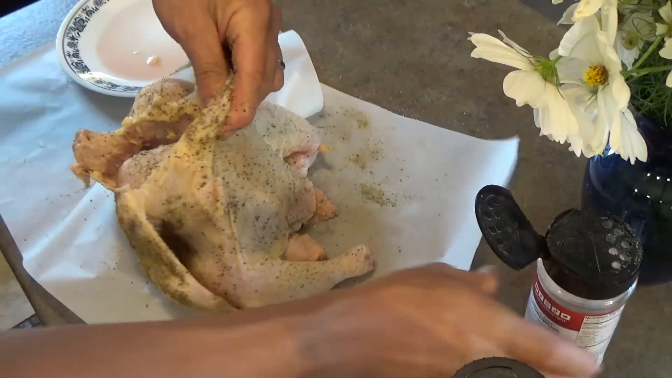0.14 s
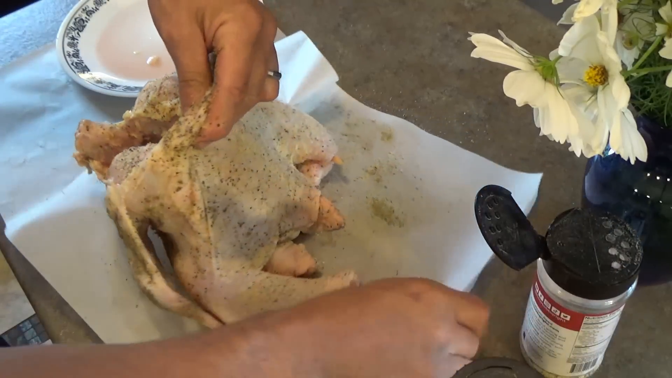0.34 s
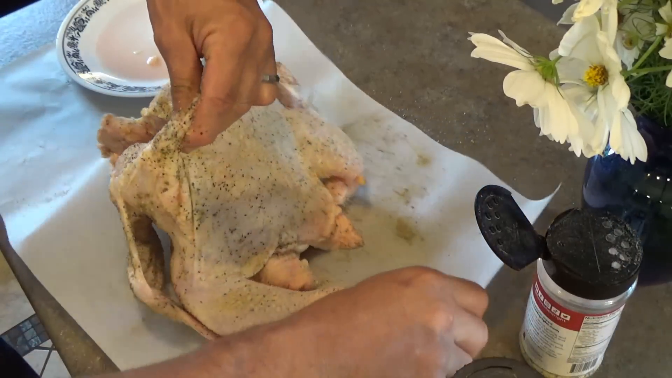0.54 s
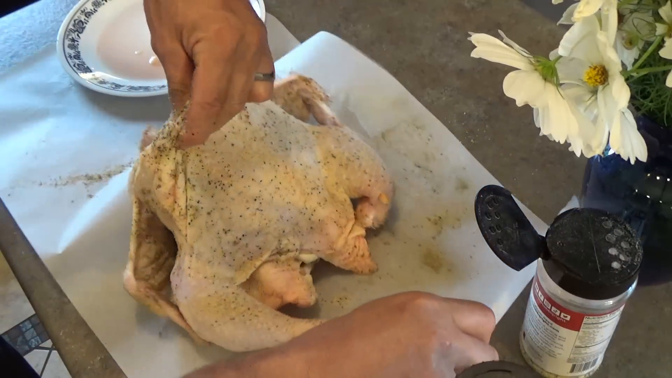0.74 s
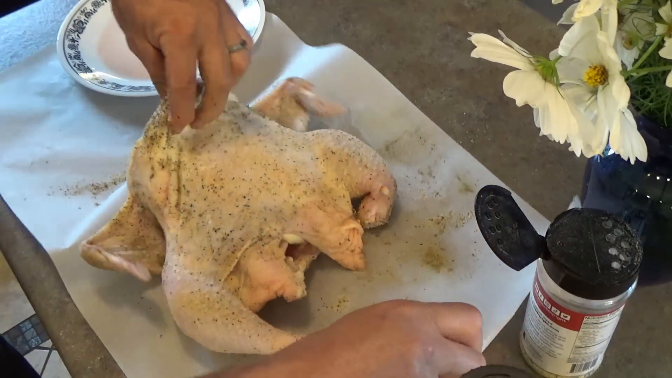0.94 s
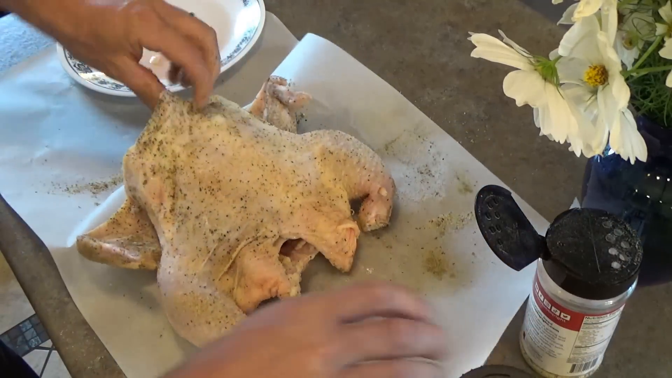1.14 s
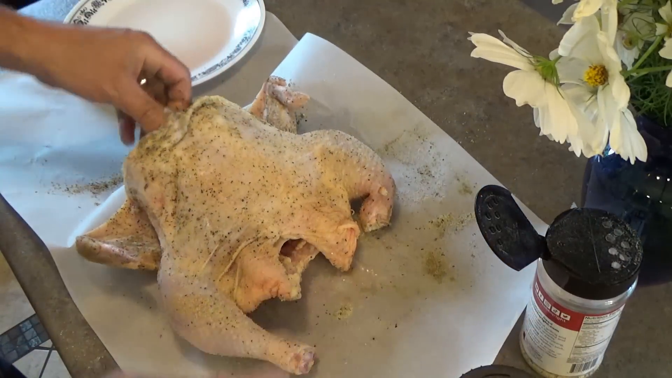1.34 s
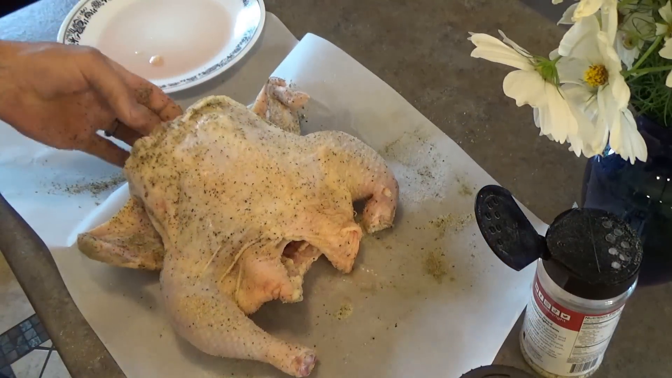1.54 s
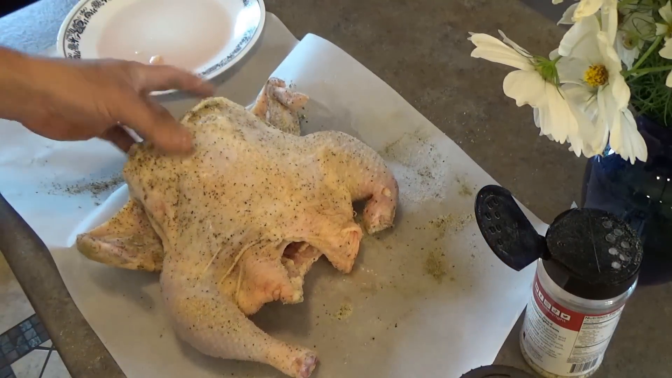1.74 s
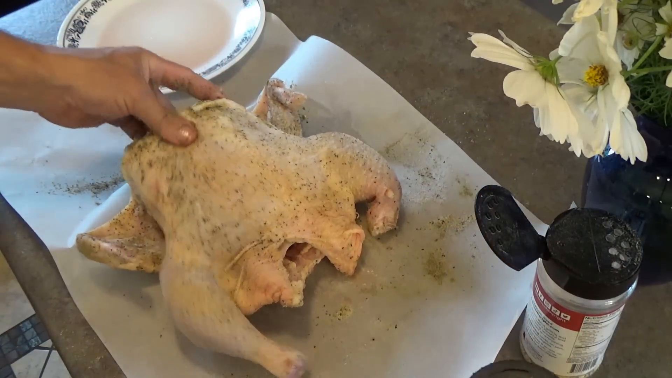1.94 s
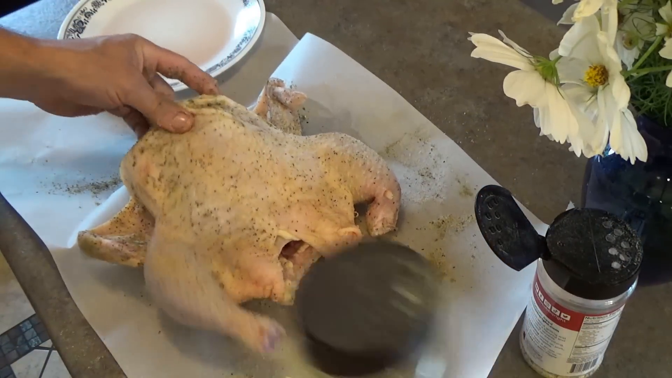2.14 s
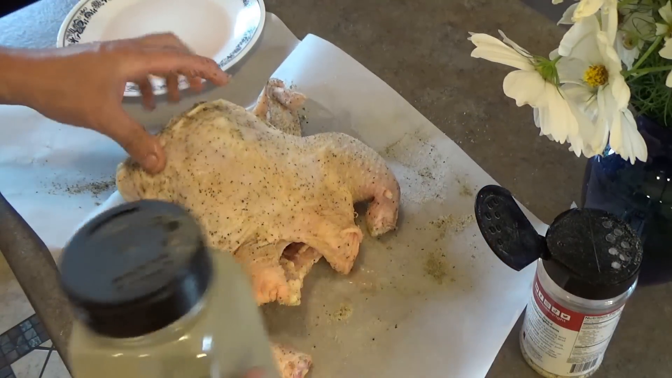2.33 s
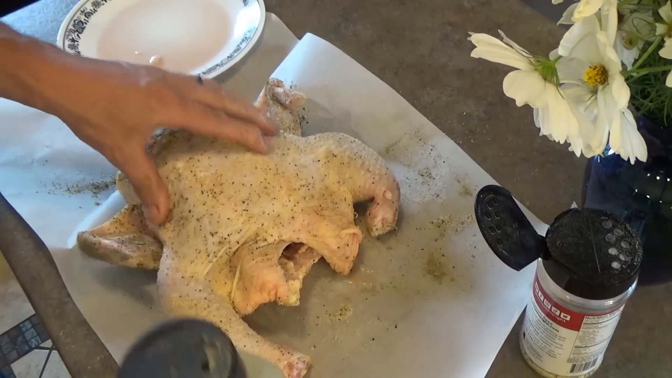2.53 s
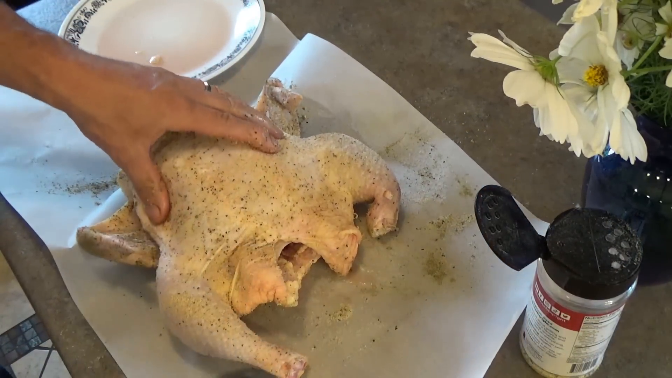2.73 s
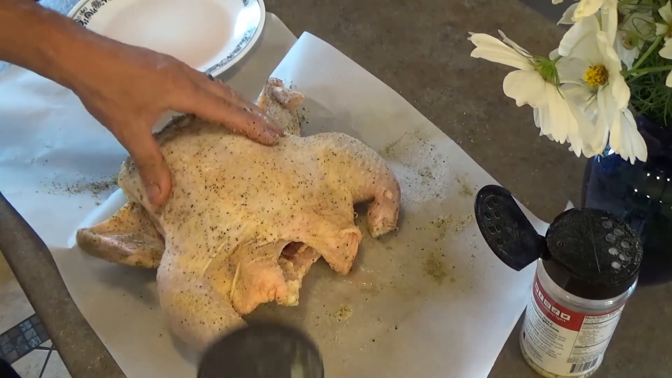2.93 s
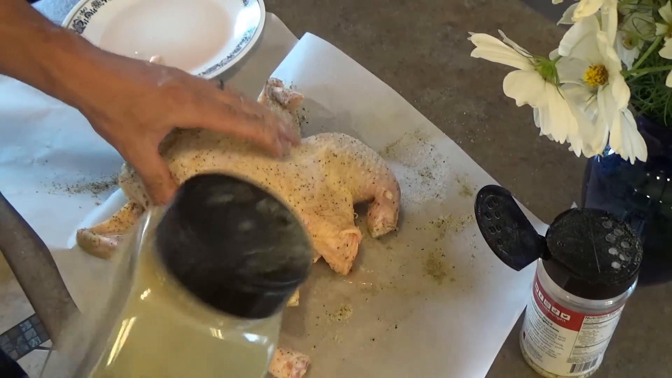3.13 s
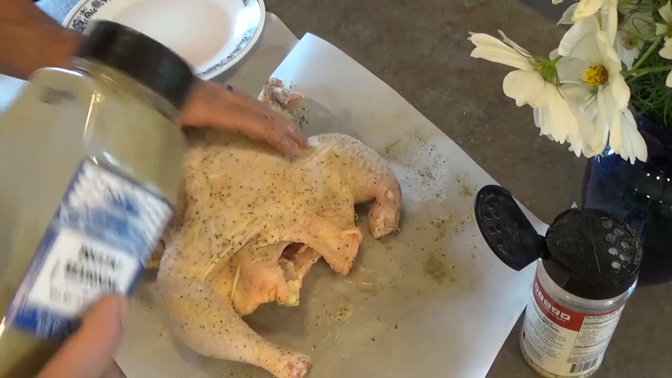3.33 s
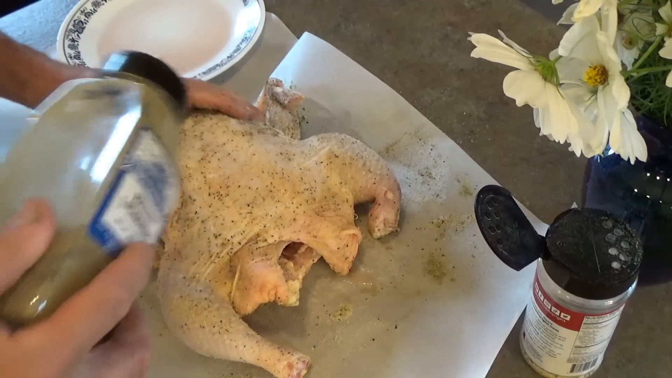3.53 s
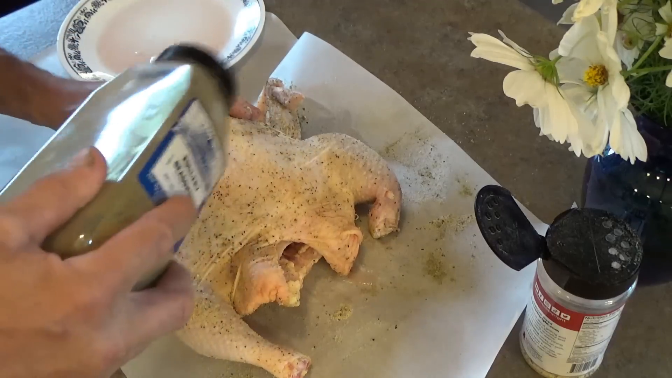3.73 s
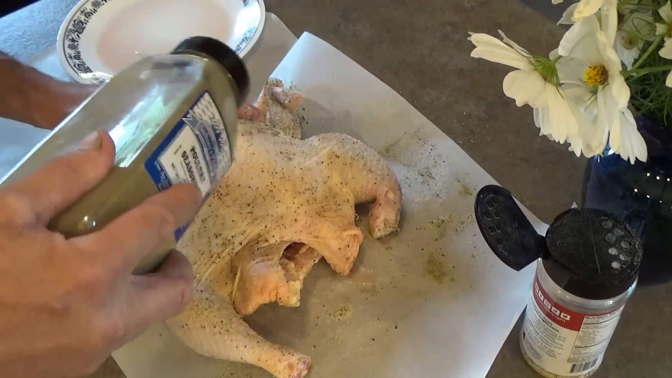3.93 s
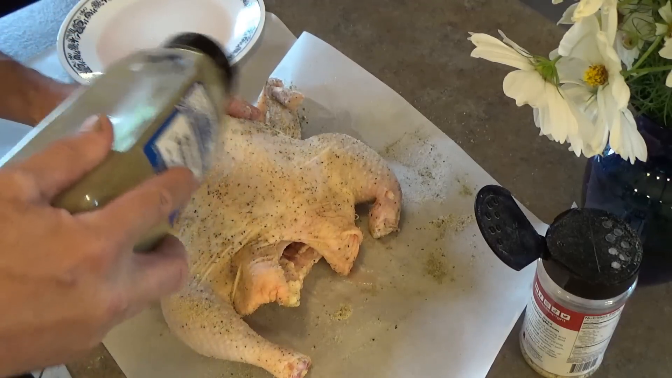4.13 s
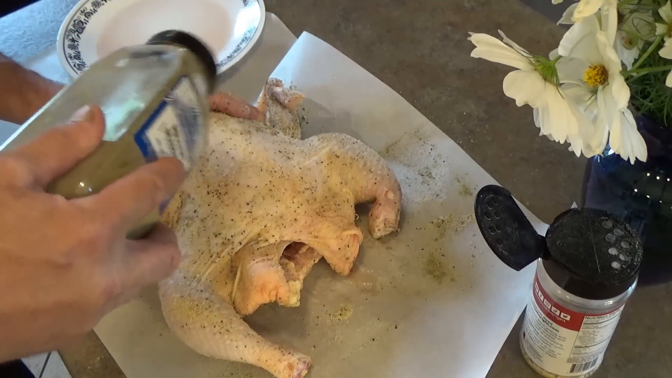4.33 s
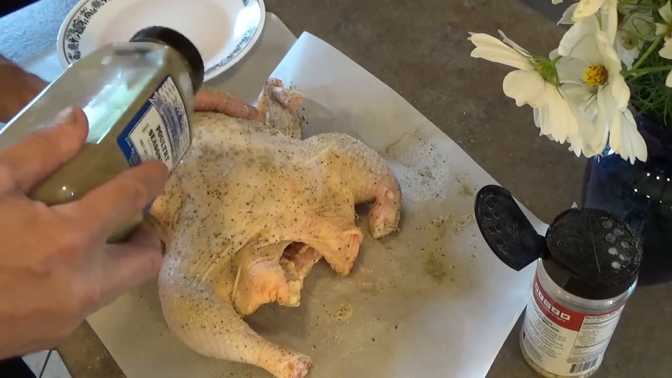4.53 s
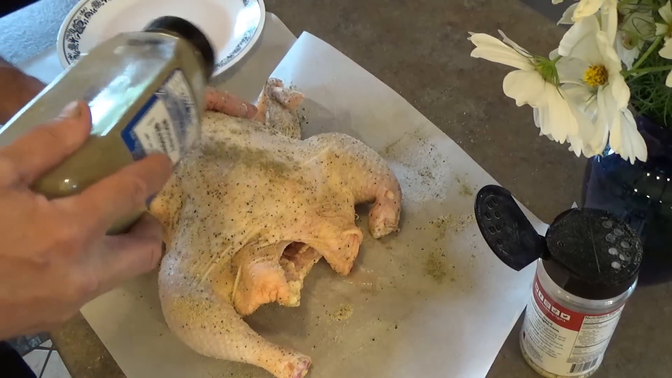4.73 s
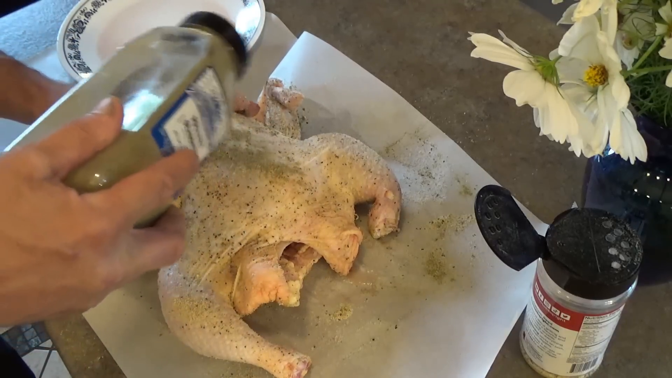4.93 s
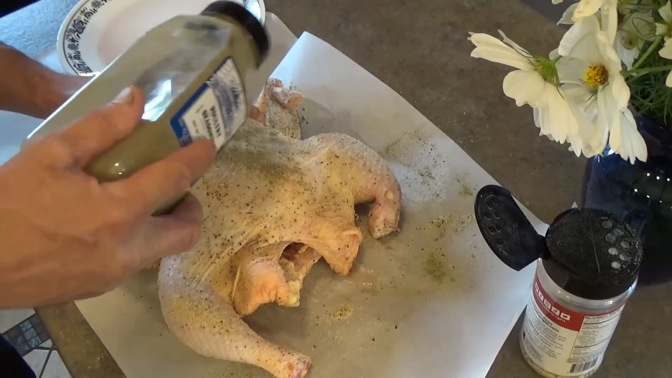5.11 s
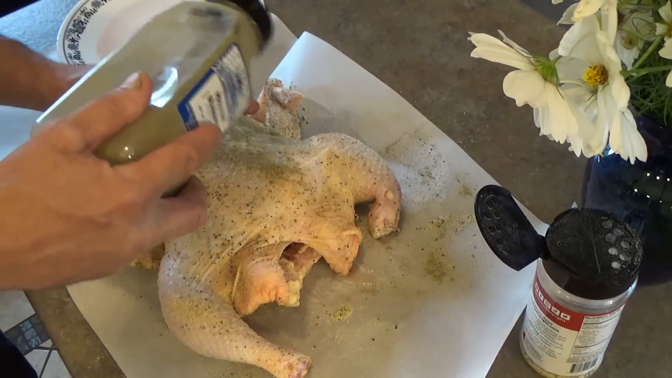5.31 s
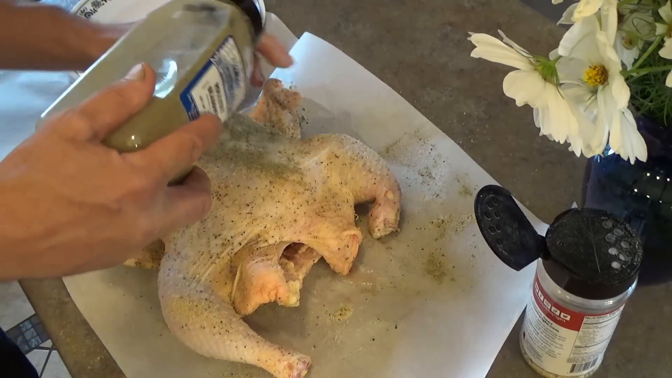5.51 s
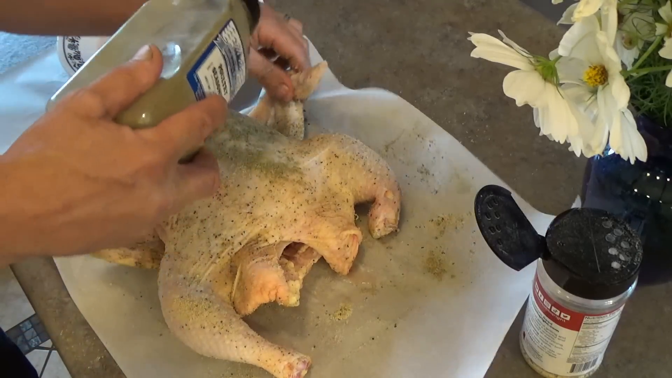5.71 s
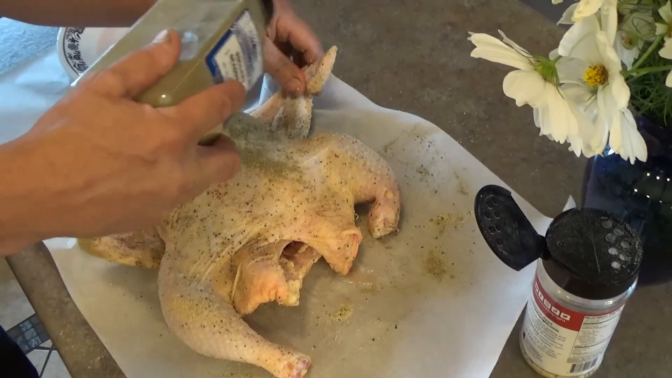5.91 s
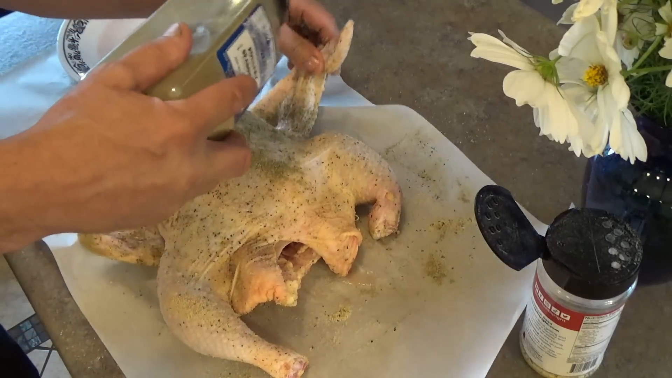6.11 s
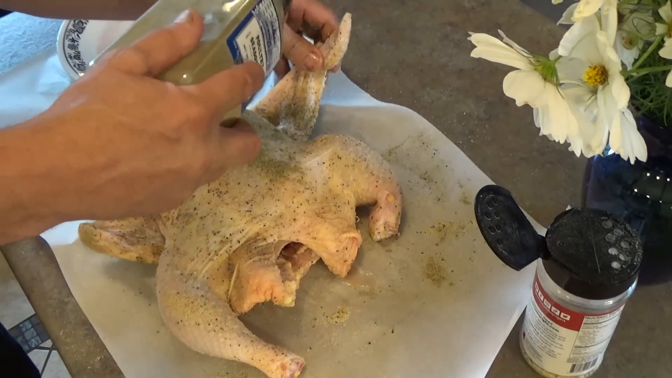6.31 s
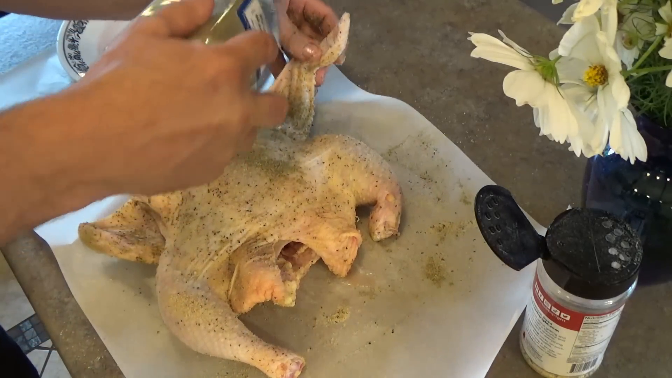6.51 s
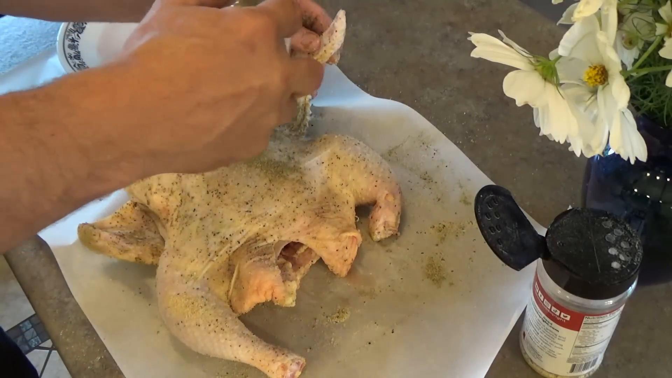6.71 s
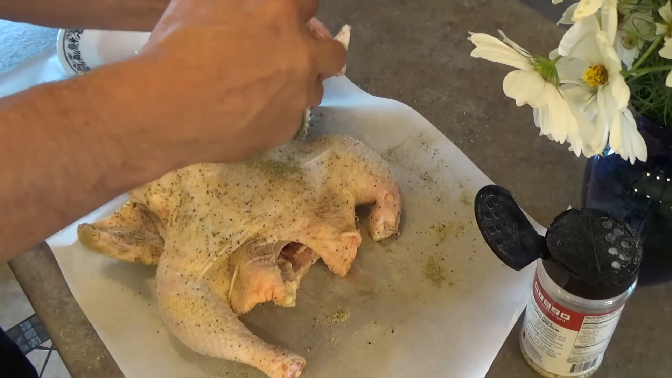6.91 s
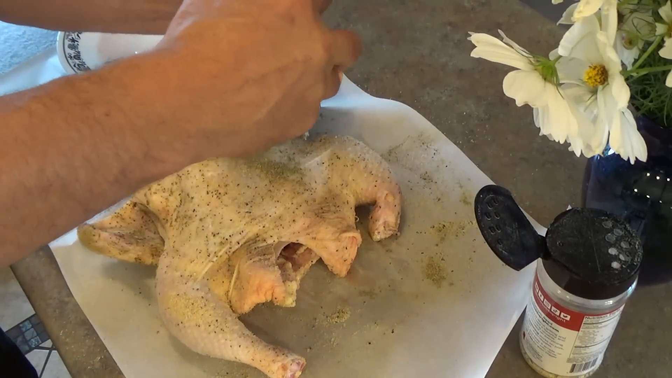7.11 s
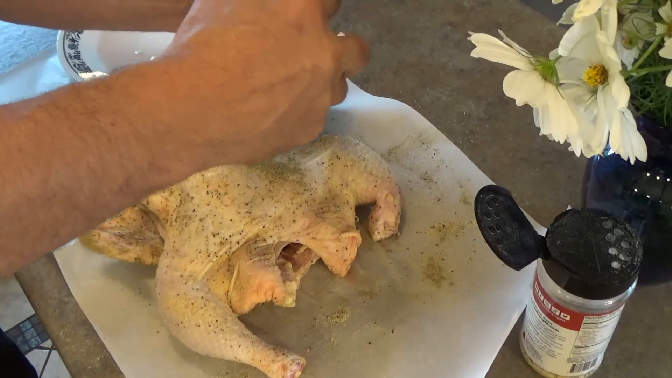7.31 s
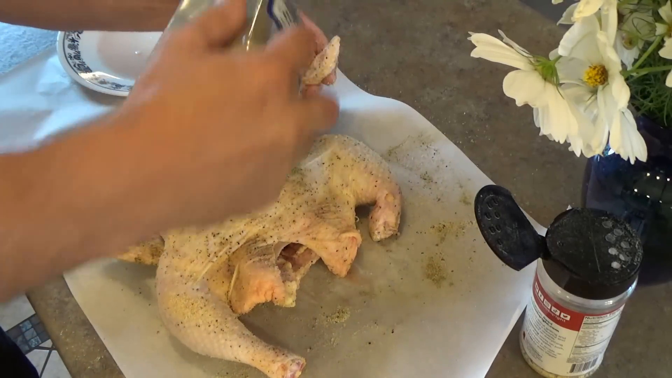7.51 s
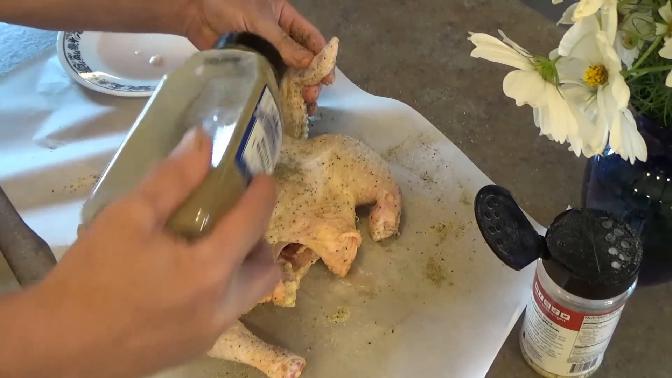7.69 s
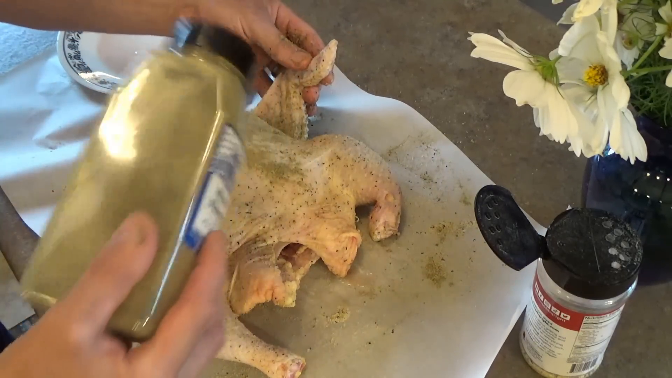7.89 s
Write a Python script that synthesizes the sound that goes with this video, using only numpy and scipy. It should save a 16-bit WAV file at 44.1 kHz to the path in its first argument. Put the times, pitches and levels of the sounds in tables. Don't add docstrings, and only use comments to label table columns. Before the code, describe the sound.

Stiff paper crackles loudly as a raw chicken is dragged round, then dull thuds, faint seasoning shakes and brief paper snaps in a humming kitchen.

```python
import sys
import numpy as np
from scipy import signal
from scipy.fft import rfft, irfft
from scipy.io import wavfile

SR = 44100
rng = np.random.default_rng(int(sys.argv[2]) if len(sys.argv) > 2 else 0)


def generate_wav(signal):
    frames = np.transpose(np.atleast_2d(signal))
    scaled = np.clip(frames, -1, 1) * 32767
    pcm = np.round(scaled).astype(np.int16)
    wavfile.write(sys.argv[1], SR, pcm)


def nominal_scale(level):
    x = np.asarray(level, float) / 20
    return 10 ** x


N = 350581

# (time [s], rustle level [dB], low share [dB])
DRAG = [
    (0.0, -31, -2),
    (0.19, -29, 3),
    (0.22, -19.5, 0),
    (0.34, -16, -6),
    (0.49, -15.5, -2),
    (0.76, -29, -1),
    (0.88, -23, 5),
    (1.05, -24, -4),
    (1.3, -62, 10),
]


def rms_one(x):
    return x / np.sqrt(np.mean(x ** 2) + 1e-20)


def at_hz(points, hz):
    table_hz, value = np.transpose(points)
    return np.interp(np.log(hz), np.log(table_hz), value)


def drift(rate):
    r = np.exp(-80 * np.pi * rate / SR)
    slow = signal.lfilter([1], [1, -2 * r, r * r], rng.standard_normal(N // 40 + 2002))[2000:]
    return np.interp(np.arange(N) / 40, np.arange(len(slow)), rms_one(slow))


def band(x, low_hz, high_hz):
    sos = signal.butter(1, [low_hz, min(high_hz, .45 * SR)], "band", fs=SR, output="sos")
    return signal.sosfilt(sos, x)


def steep_band(x, low_hz, high_hz):
    return signal.sosfilt(signal.butter(2, [low_hz, high_hz], "band", fs=SR, output="sos"), x)


def microphone(x, low_hz, high_hz):
    x = signal.sosfilt(signal.butter(3, low_hz, "high", fs=SR, output="sos"), x)
    return signal.sosfilt(signal.butter(3, high_hz, fs=SR, output="sos"), x)


def ring(force, hz, t60):
    r, w = nominal_scale(-60 / (t60 * SR)), 2 * np.pi * hz / SR
    return signal.lfilter([0, np.sin(w)], [1, -2 * r * np.cos(w), r * r], force + 1e-18)


def add(out, sound, s, peak_db):
    i = round(s * SR)
    scaled = nominal_scale(peak_db) * sound / np.abs(sound).max()
    out[..., i:i + sound.shape[-1]] += scaled[..., :N - i]


def colour(x, spectrum):
    hz = np.maximum(np.arange(1025) * SR / 2048, 1)
    cepstrum = irfft(np.log(nominal_scale(at_hz(spectrum, hz))))
    cepstrum[1:1024] *= 2
    cepstrum[1025:] = 0
    return signal.oaconvolve(x, irfft(np.exp(rfft(cepstrum))))[:len(x)]


def sheet_motion():
    # (time [s], rustle level [dB])
    handling = [(0.0, -50), (1.3, -45.5), (1.86, -46), (2.17, -44.5), (2.3, -50), (2.9, -58.5),
                (3.2, -49.5), (3.78, -58), (4.7, -58.5), (5.25, -61.5), (5.47, -55), (5.67, -38),
                (6.24, -41.5), (6.44, -46), (6.8, -50.5), (7.59, -52), (7.77, -56.5), (7.95, -50)]
    # (time of peak [s], level [dB], low share [dB], rise [dB/ms])
    slides = [(0.175, -23, 5, 0.8), (0.815, -28, 5, 0.8), (0.69, -30, 3, 0.3), (1.4, -56, 12, 0.2),
              (1.86, -53, 12, 0.15), (1.55, -45.5, 3.5, 0.3), (1.64, -51, 14.5, 1.5), (2.55, -45, 6, 1.5),
              (2.63, -47, 5, 0.3), (2.79, -46.5, 6, 0.3), (3.14, -68, 14.5, 0.4), (4.83, -54, -8, 0.4),
              (5.515, -33, 11, 0.8), (5.56, -31, -3, 1.2), (5.778, -33, 4, 0.3), (5.96, -39.5, -11, 0.4),
              (6.06, -31, -14, 2.0), (6.33, -40, 0.5, 0.3), (7.31, -58.5, 18, 1.5), (7.935, -42, 8, 1.2)]
    fall_db_per_s = 218
    t = np.arange(N) / SR
    s, level_db, low_db = np.transpose(DRAG)
    drag = nominal_scale(np.interp(t, s, level_db, right=-99))
    idle = nominal_scale(np.interp(t, *np.transpose(handling)))
    bright = drag + idle
    low = drag * nominal_scale(np.interp(t, s, low_db)) + idle * nominal_scale(-1)
    for s, db, low_db, rise in slides:
        span = slice(round((s - .2) * SR), round((s + .4) * SR))
        age = t[span] - s
        slide = nominal_scale(db + np.minimum(age * 1000 * rise, -age * fall_db_per_s))
        bright[span] += slide
        low[span] += slide * nominal_scale(low_db)
    return bright, low


def rustle(per_s, spread_db, clump_db, hiss, patchy_db):
    # (frequency [Hz], level per Hz [dB])
    paper = [(120, -71), (250, -26), (400, -16), (696, -9), (1160, -5.5), (1680, -0.5), (2290, -0.5),
             (4600, 0.5), (9400, -4.5), (11800, -19), (16000, -26)]
    panel_edges_hz = [100, 2200, 3800, 6000, 9000, 18000]
    born = rng.random(N) < per_s * nominal_scale(clump_db * drift(90.0)) / SR
    strength = nominal_scale(spread_db * np.minimum(rng.exponential(1, N), 5))
    slips = rms_one(born * strength * rng.choice([-1, 1], N))
    dealt = rng.integers(0, 5, N)
    fibres = hiss * rng.standard_normal(N)
    bright_gain, low_gain = sheet_motion()
    sheet = 0
    for k, (low_hz, high_hz) in enumerate(zip(panel_edges_hz, panel_edges_hz[1:])):
        panel = steep_band(np.sqrt(5) * slips * (dealt == k) + fibres, low_hz, high_hz)
        gain = bright_gain if k else low_gain * nominal_scale(3.0)
        sheet = sheet + panel * nominal_scale(patchy_db * drift(25.0)) * gain
    paper_gain = np.linalg.norm(colour(np.eye(1, 2048)[0], paper))
    return nominal_scale(-1.5 + 0.8 * drift(19.0)) * colour(sheet, paper) / paper_gain


def buckle(table, low_db, burst_ms, settle_db):
    width, broad_db, settle_t60, side_db = 1.42, -5.0, 0.4, -10.0
    out, t = np.zeros((2, N)), np.arange(SR // 5) / SR
    settle = nominal_scale(-60 * t / settle_t60) * np.clip(t / 0.0016, 0, 1)
    age = t * 1000 / burst_ms
    noise = rng.standard_normal((len(table), 3, SR // 5))
    noise[:, 0] *= np.abs(noise[:, 0]) ** .5 * np.sqrt(age + 0.08) * np.exp(-age)
    noise[:, 1:] *= nominal_scale(settle_db) * settle * nominal_scale([[0], [side_db]])
    noise += 1e-18
    wide = nominal_scale(broad_db) * band(band(noise, 1900, 9100), 1400, 14000)
    wide += nominal_scale(low_db) * band(band(noise, 450, 1700), 400, 2200)
    for (s, db, hz), raw, broad in zip(table, noise, wide):
        bump = band(band(raw, hz / width, hz * width), 0.6 * hz, 2.2 * hz)
        burst, mid, side = bump + broad
        add(out, burst + mid + side * [[1], [-1]], s, db + 1)
    return out


def snaps():
    # (time [s], peak [dB], centre [Hz])
    dragged = [(0.0383, -10, 3500), (0.045, -13, 5000), (0.0598, -1, 4000), (0.0914, -9, 3900),
               (0.0945, -7, 1800), (0.1323, -9, 7500), (0.162, -6, 3890), (0.1645, -5, 4400),
               (0.174, -9, 2300), (0.2044, -5, 2220), (0.205, -4, 7500), (0.2104, -3, 1700),
               (0.2135, -5, 3000), (0.244, -8, 2500), (0.3135, -4, 2000), (0.342, -4, 3900),
               (0.3691, -3, 5140), (0.4229, -3, 4500), (0.4658, -5, 2030), (0.487, -3, 3700),
               (0.508, -4, 3300), (0.6454, -9, 3660), (0.7025, -8, 1500), (0.753, -14, 4000),
               (0.799, -8, 6000), (0.8145, -9, 1600), (0.8574, -5, 1800), (0.882, -4, 5000),
               (0.894, -9, 1600), (0.909, -9, 5500), (0.981, -14, 2500), (0.2713, -2, 7700),
               (0.2892, -1, 2900), (0.3097, -2, 3710), (0.3391, -3, 5470), (0.363, 0, 5160),
               (0.385, -4.5, 5030), (0.4359, 0, 4590), (0.4735, -3, 3840), (0.5033, -1.5, 5850),
               (0.5352, -13, 5850), (0.5696, -7, 2500), (0.698, -13, 2000), (0.737, -1, 3200),
               (0.766, -1, 4000), (0.8021, -2, 3000), (0.8615, -5, 2000), (0.8779, 2, 6000),
               (0.879, -3, 1600), (0.9403, -1.5, 4170), (0.9625, -4, 5500), (0.993, -7, 5850),
               (1.0016, -4, 5800), (1.0224, -11, 5990)]
    relaxing = [(1.2085, -13, 4000), (1.2262, -18, 5450), (1.2705, -18.5, 3520), (1.2873, -16, 9280),
                (1.3197, -21, 5920), (1.46, -12, 3500), (1.4635, -20, 4000), (1.492, -23, 4720),
                (1.498, -26, 8000), (1.502, -25, 4700), (1.5205, -24, 2800), (1.5601, -12, 3980),
                (1.569, -16, 2500), (1.6303, -7, 4300), (1.6306, -12, 1800), (1.631, -8, 7800),
                (1.638, -20, 9500), (1.8595, -25, 3580), (1.8791, -24, 6000), (1.9181, -8, 6000),
                (1.934, -18, 3500), (2.0487, -28, 5840), (2.0732, -27, 4340), (2.0857, -22, 5700),
                (2.1522, -11, 5770), (2.161, -20, 4000), (2.171, -19, 5000), (2.1778, -14, 4450),
                (2.2448, -26.5, 7840), (2.5325, -15, 3000), (2.537, -24, 4000), (2.579, -21, 2100),
                (2.557, -21, 5200), (2.562, -22, 4900), (2.76, -17, 7300), (2.766, -23, 5000),
                (2.762, -24, 1800), (2.9045, -30, 3300)]
    shaken = [(3.218, -31, 6480), (3.4126, -25.5, 8200), (3.424, -29, 8500), (4.8045, -24, 4200),
              (6.606, -27, 6330), (6.6488, -27, 4200), (6.729, -33, 6020), (6.759, -32.5, 2490),
              (7.153, -30, 2800), (7.3428, -17.5, 5240), (7.474, -29.5, 6000), (7.9307, -24, 2600)]
    lifted = [(5.4945, -26, 8000), (5.5002, -16, 2000), (5.505, -15, 1800), (5.5098, -12, 7500),
              (5.513, -7, 9000), (5.5118, -4, 3940), (5.554, -9, 8500), (5.546, -14, 6000),
              (5.549, -9, 4300), (5.558, -8, 4600), (5.634, -19, 4140), (5.713, -22, 4550),
              (5.7289, -17, 3500), (5.7442, -14, 5500), (5.762, -14, 5000), (5.767, -13, 2500),
              (5.7527, -12, 5220), (5.7728, -6.5, 4600), (5.9183, -19, 3370), (5.947, -19, 4000),
              (5.9522, -12, 5570), (6.0422, -1, 6000), (6.0438, -2, 5300), (6.0455, -1, 4700),
              (6.054, -9, 5070), (6.243, -22, 8480), (6.3047, -21, 4830), (6.3204, -19, 5730),
              (6.371, -24, 4210), (6.4123, -21, 5560), (6.4438, -16, 6240), (6.45, -19, 3500)]
    creases = buckle(dragged, low_db=-24, burst_ms=0.9, settle_db=-27)
    creases += buckle(relaxing, low_db=-24, burst_ms=0.7, settle_db=-27.5)
    creases += buckle(shaken, low_db=-34, burst_ms=0.9, settle_db=-24)
    creases += buckle(lifted, low_db=-42, burst_ms=1.1, settle_db=-20)
    heard = microphone(microphone(creases, 345, 11000), 100, 11500)
    return heard + nominal_scale(-18) * band(creases, 11500, 19000)


def ticks():
    # (time [s], peak [dB], centre [Hz])
    flexes = [(0.2725, -3, 3600), (1.2085, -9, 8800), (1.245, -24, 5000), (1.342, -30, 7000),
              (2.6722, -26, 5500), (2.9019, -8, 8000), (2.903, -23, 4000), (4.3558, -27, 8400),
              (4.3835, -36, 8500), (4.7207, -27, 8900), (4.7861, -22, 2700), (4.787, -25, 9000),
              (4.7935, -26, 4200), (4.8005, -30, 8800), (4.8045, -19, 8900), (4.905, -30, 7000),
              (5.033, -36, 8500), (5.0925, -30, 5830), (5.114, -38, 9000), (5.187, -36, 9000),
              (5.2145, -29, 6500), (5.281, -36, 5000), (5.3078, -32, 6130), (5.326, -38, 5000),
              (5.4056, -33, 5000), (5.4402, -33, 8000), (5.451, -27, 8970), (5.4635, -32, 9000),
              (5.495, -28, 13000), (5.527, -12, 1600), (5.599, -18, 6000), (6.033, -25, 8000),
              (6.039, -25, 8000), (6.048, -8, 4500)]
    length_ms, width, broad_db = 0.9, 1.2, -11
    out, age = np.zeros(N), np.arange(600) * 1000 / SR / length_ms
    for (s, db, hz), noise in zip(flexes, rng.standard_normal((len(flexes), 600))):
        click = np.sign(noise[0]) * 5.0 * (age == 0)
        raw = (0.6 * noise + click) * np.exp(-age)
        bump = band(band(raw, hz / width, hz * width), hz / width, hz * width)
        broad = microphone(raw, 2200, 9000) + nominal_scale(-24) * raw
        add(out, microphone(bump, 300, max(10500, 1.2 * hz)) + nominal_scale(broad_db) * broad, s, db)
    return out


def thuds():
    # (time [s], peak [dB], low note [Hz], high note [Hz], puff [dB])
    soft_blows = [(0.0, -22.5, 300, 1120, 7), (1.785, -33, 300, 420, 7), (2.464, -34, 227, 824, 7),
                  (2.5325, -7.5, 237, 900, 0), (2.556, -21, 450, 750, 6), (2.5795, -15, 270, 540, 2),
                  (2.6725, -15, 320, 470, 0), (2.76, -22, 300, 600, 5), (2.985, -38, 420, 910, 7),
                  (3.106, -29, 790, 1510, 2), (3.113, -30, 700, 800, 2), (3.126, -36, 500, 1200, 3),
                  (3.1405, -28, 1000, 1400, 2), (3.1465, -25, 557, 1300, 0), (5.51, -32, 330, 500, 7),
                  (5.773, -28, 400, 480, 7), (6.05, -38, 350, 480, 7), (7.3, -38, 250, 330, 5)]
    t60, contact_ms = 0.04, 0.45
    out, t = np.zeros(N), np.arange(8000) / SR
    push = t * np.exp(-t * 4000 / contact_ms)
    noises = rng.standard_normal((len(soft_blows), 8000))
    for (s, db, low_hz, high_hz, puff_db), noise in zip(soft_blows, noises):
        note = ring(push, low_hz, t60) + 2.6 * ring(push, high_hz, 0.35 * t60)
        puff = microphone(band(noise, low_hz / 1.5, 1.3 * high_hz), low_hz / 2, 1.5 * high_hz)
        puff = puff * nominal_scale(-60 * t / (3.0 * t60))
        add(out, note / np.abs(note).max() + nominal_scale(puff_db) * puff, s, db - 1.5)
    return out


def rubs(width, rough_db):
    # (start [s],
    # length [s], level [dB], resonance [Hz])
    frictions = [(0.05, 0.95, -48, 450), (0.2, 0.4, -42, 750), (0.3, 0.25, -32, 4600),
                 (0.75, 0.45, -60, 220), (1.1, 0.9, -58, 350), (0.1, 1.0, -62, 170), (1.1, 1.0, -66, 150),
                 (6.0, 1.0, -69, 150), (7.0, 0.95, -69, 150), (7.2, 0.3, -60, 230), (2.6, 0.3, -49, 950),
                 (2.55, 0.035, -40, 6500), (1.2, 0.8, -58, 900), (2.66, 0.06, -48, 7500),
                 (2.775, 0.05, -50, 11000), (4.8, 0.08, -50, 8500), (4.8, 0.07, -52, 4000),
                 (1.72, 0.25, -52, 550), (1.25, 0.5, -57, 650), (2.6, 0.28, -48, 1800),
                 (2.745, 0.07, -42, 8000), (2.91, 0.1, -50, 6000), (3.19, 0.12, -50, 8000),
                 (3.36, 0.4, -58, 4300), (6.9, 0.22, -54, 2300), (7.56, 0.07, -54, 4500),
                 (7.72, 0.06, -53, 2600), (7.918, 0.08, -39, 2600), (7.81, 0.14, -54, 4300)]
    out = np.zeros(N + SR)
    for (s, length, db, hz), noise in zip(frictions, rng.standard_normal((len(frictions), SR))):
        age = np.clip(np.arange(SR) / SR / length, 0, 1)
        rubbed = rms_one(band(band(noise, hz / width, hz * width), hz / width, hz * width))
        out[round(s * SR):][:SR] += nominal_scale(db) * rubbed * np.sin(np.pi * age ** 0.6)
    return out[:N] * nominal_scale(rough_db * drift(40.0))


def granules(per_s, low_hz, high_hz):
    # (first stroke [s], last stroke [s], rate [strokes/s], level [dB])
    shaking = [
        (3.79, 4.68, 11.4, -56),
        (5.10, 5.42, 9.5, -58),
    ]
    stroke_ms = 22
    strokes, t = np.zeros(N), np.arange(-3000, 3001) / SR
    for first_s, last_s, rate, db in shaking:
        s = np.arange(first_s, last_s, 1 / rate)
        strokes[(s * SR).astype(int)] = nominal_scale(db + 2.5 + rng.normal(0, 1.2, len(s)))
    gain = signal.oaconvolve(strokes, np.exp(-(t * 1000 / stroke_ms) ** 2), "same")
    grains = (rng.random(N) < per_s / SR) * rng.standard_normal(N)
    return gain * rms_one(microphone(band(grains, low_hz, high_hz), low_hz, high_hz))


def struck(hits, modes, smear_ms, gain_db):
    out, t = np.zeros(N), np.arange(20000) / SR
    for (s, db), noise in zip(hits, rng.standard_normal((len(hits), 20000))):
        force = noise * t * np.exp(-t * 1000 / smear_ms)
        rung = sum(nominal_scale(d) * np.sqrt(t60) * rms_one(ring(force, hz, t60)) for hz, d, t60 in modes)
        add(out, rung, s - .004, db + gain_db)
    return out


def far_knocks():
    # (time [s], peak [dB])
    knocks = [
        (7.2955, -14.5),
        (7.322, -20),
        (7.383, -29),
        (7.922, -23),
    ]
    # (frequency [Hz], level [dB], t60 [s])
    hollow = [(250, -21, 0.08), (420, -22, 0.05), (624, -7, 0.06), (765, -2, 0.07), (890, -5, 0.05),
              (980, -8, 0.05), (1180, 0.5, 0.05), (1240, -2, 0.05), (1440, -7, 0.05), (1600, -12, 0.05),
              (1860, -13, 0.04), (2250, -13, 0.04), (1080, -9, 0.05), (1300, -11, 0.05)]
    return struck(knocks, hollow, smear_ms=8.5, gain_db=-2.5)


def far_tinks():
    # (time [s], peak [dB])
    tinks = [
        (6.8019, -45),
        (7.014, -39),
    ]
    # (frequency [Hz], level [dB], t60 [s])
    metal = [(10600, 0, .3), (10950, -5, .1), (6650, -7, .3), (2250, -6, .2)]
    return struck(tinks, metal, smear_ms=2.8, gain_db=-1.5)


def room(x, side_db, early_db):
    # (frequency [Hz], t60 [s])
    room_t60 = [(150, 0.61), (1000, 0.53), (4000, 0.26), (12000, 0.52)]
    t = np.arange(round(.9 * SR)) / SR
    tail = np.zeros((2, len(t)))
    for hz in 90 * 2 ** np.arange(8.):
        octave = band(rng.standard_normal(tail.shape), hz / 2 ** .5, hz * 2 ** .5)
        tail += octave * nominal_scale(-60 * t / at_hz(room_t60, hz))
    tail *= np.clip((t - .003) / 0.0046, 0, 1)
    tail /= np.sqrt(np.sum(tail[0] ** 2))
    tail[0, [round(d * SR) for d in (.0045, .011, .017)]] += nominal_scale(early_db)
    mid, side = signal.oaconvolve(x[None], tail)[:, :N]
    return mid + nominal_scale(side_db) * band(side, 1030, 11000) * [[1], [-1]]


def counter():
    # (time [s], peak [dB])
    jolt_table = [
        (0.0, -58),
        (1.77, -66),
        (2.17, -61),
        (2.531, -49),
        (2.67, -56),
        (2.76, -58),
        (5.77, -74),
        (6.04, -74),
        (7.93, -68),
    ]
    jolt_hz, jolt_t60, drag_rumble_db, still_rumble_db = 70, 0.12, -56, -85
    jolts, t = np.zeros(N), np.arange(N) / SR
    jolts[[round(s * SR) for s, db in jolt_table]] = nominal_scale([db for s, db in jolt_table])
    s, level_db, _ = np.transpose(DRAG)
    gain = nominal_scale(drag_rumble_db + np.interp(t, s, level_db)) + nominal_scale(still_rumble_db)
    rumble = rms_one(band(band(rng.standard_normal(N), 20, 110), 25, 130))
    shudder = ring(jolts, jolt_hz, jolt_t60) + 0.6 * ring(jolts, 0.55 * jolt_hz, jolt_t60)
    return gain * rumble + shudder


def refrigerator():
    # (frequency [Hz], rms level [dB])
    hum = [(592.2, -63.5), (710.6, -70), (829.0, -65), (1184, -67), (1545, -72), (2013, -95)]
    t = np.arange(N) / SR
    out = 0
    for hz, db in hum:
        out = out + nominal_scale(db + 3.0 + 0.96 * drift(3.8)) * np.sin(2 * np.pi * hz * t + .5 * drift(3.9))
    return out


def camera_motor(peak_db, length_ms, lag_ms):
    pictures_per_s, first_s, tone_hz = 29.97, .0159, 3192
    t, period = np.arange(N) / SR, 1 / pictures_per_s
    lag = np.array([[-.5], [.5]]) * lag_ms / 1000
    since = (t - first_s - lag + .5 * period) % period
    gate = np.exp(-((since - .5 * period) * 2000 / length_ms) ** 4)
    wander = nominal_scale(1.5 * drift(13.0) + 1.5 * drift(1.5))
    return nominal_scale(peak_db) * wander * gate * np.sin(2 * np.pi * tone_hz * t)


def air(patchy_db):
    # (frequency [Hz], level [dB])
    tone = [(12, -71), (110, -31), (198, -13), (234, -5.5), (388, -3.5), (590, -2), (642, -4), (849, -6),
            (1760, -12), (2990, -14), (3250, -12), (3630, -16.5), (8650, -19.5), (16000, -28)]
    # (frequency [Hz], left-right likeness [-1 to 1])
    likeness = [(60, 0.79), (180, 1), (550, 0.85), (1650, 0.11), (4970, 0.62), (15000, 1)]
    out, edges = 0, 40 * 2 ** np.arange(0, 9, 2 / 3)
    white = rng.standard_normal((2, 2, N))
    for k, (low, high) in enumerate(zip(edges, edges[1:])):
        both = steep_band(white[k % 2], low, high)
        centre = np.sqrt(low * high)
        alike = np.clip(at_hz(likeness, centre), -1, 1)
        same, other = np.sqrt(1 + alike), np.sqrt(1 - alike)
        gain = nominal_scale(at_hz(tone, centre) + patchy_db * drift(7.7))
        out = out + gain * (np.array([[same, other], [same, -other]]) @ both)
    return nominal_scale(-50.5) * rms_one(out)


def scene():
    # (time [s], left-right difference [dB])
    where = [(0.0, 2.5), (0.29, 0), (1.24, 1.5), (1.55, 2), (3.12, 0), (3.36, 4), (3.94, 0.0), (4.4, -1),
             (4.78, 1.5), (5.18, -0.5), (7.95, 1.5)]
    s, pan_db = np.transpose(where)
    pan = nominal_scale(np.interp(np.arange(N) / SR, s, pan_db) * [[.5], [-.5]])
    sheet = rustle(per_s=4000.0, spread_db=2.5, clump_db=2.5, hiss=0.35, patchy_db=1.5)
    sheet = sheet + granules(per_s=6800.0, low_hz=4000, high_hz=10000)
    creases = snaps()
    dry_ticks = ticks()
    blows = thuds() + rubs(width=1.2, rough_db=2.5)
    far = microphone(far_knocks() + far_tinks(), 300, 19000)
    into_room = sheet + 0.58 * creases.mean(0) + 0.3 * dry_ticks + blows + 1.74 * far
    wet = room(into_room, side_db=-4.0, early_db=-15.5)
    near = pan * (sheet + creases + dry_ticks + blows)
    background = counter() + refrigerator() + camera_motor(-47, 9.9, 1.4) + air(patchy_db=1.5)
    return microphone(near + far + nominal_scale(-9) * wet, 177, 18500) + background


def top_cut(x):
    return signal.sosfilt(signal.butter(12, 15800, fs=SR, output="sos"), x)


def record(dry):
    high_pass = signal.butter(2, 500, "high", fs=SR, output="sos")
    excess = signal.sosfilt(high_pass, dry - np.clip(dry, -.9, .9))
    held = np.clip(dry - excess, -.95, .95)
    return top_cut(held)


dry = scene()
out = record(dry)
generate_wav(out)
```